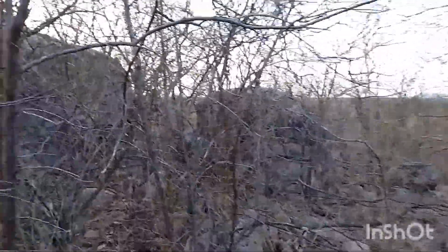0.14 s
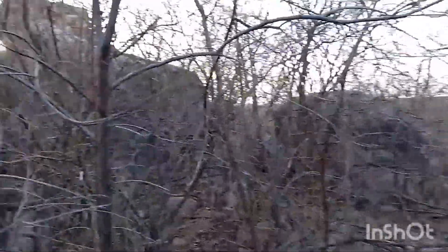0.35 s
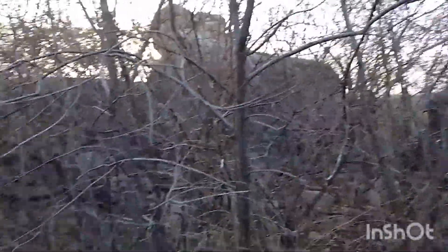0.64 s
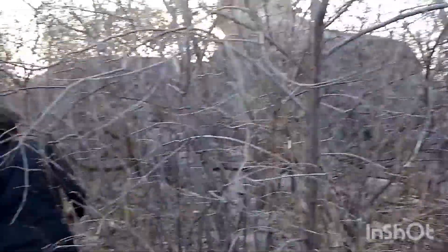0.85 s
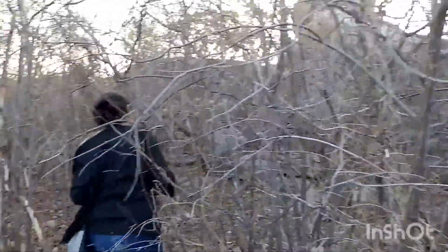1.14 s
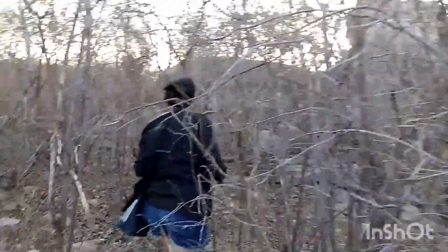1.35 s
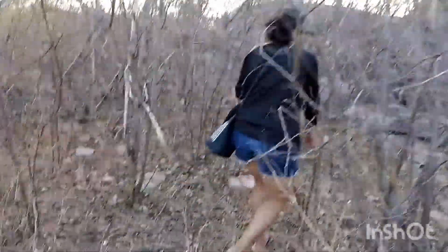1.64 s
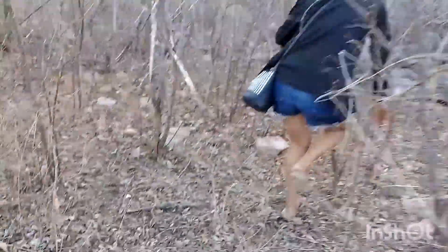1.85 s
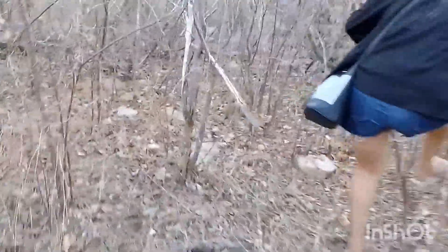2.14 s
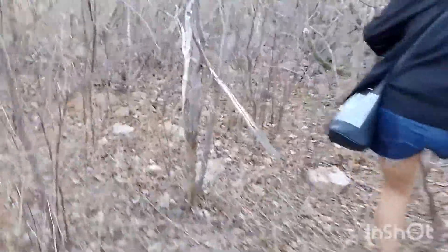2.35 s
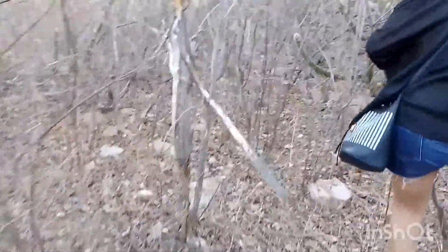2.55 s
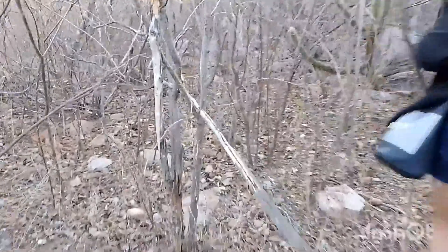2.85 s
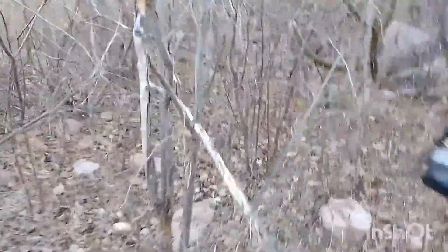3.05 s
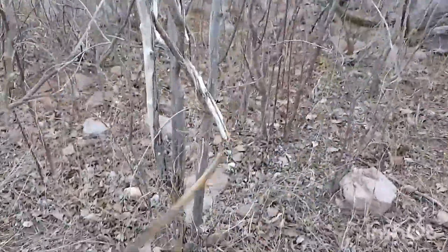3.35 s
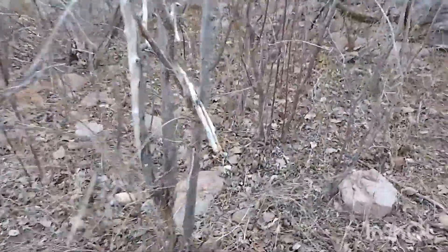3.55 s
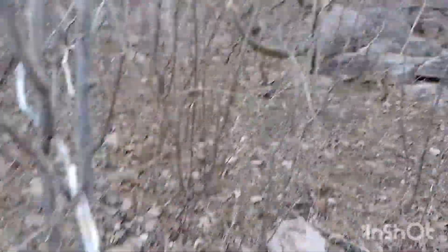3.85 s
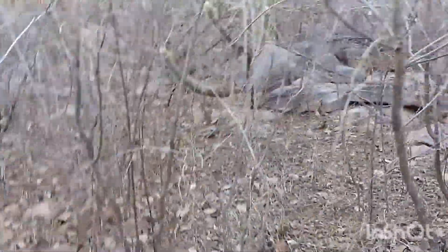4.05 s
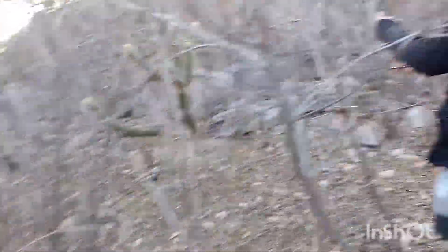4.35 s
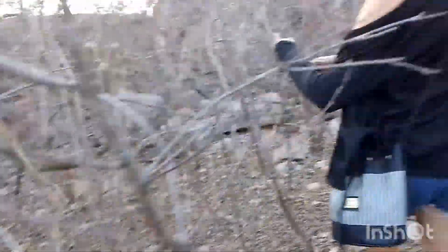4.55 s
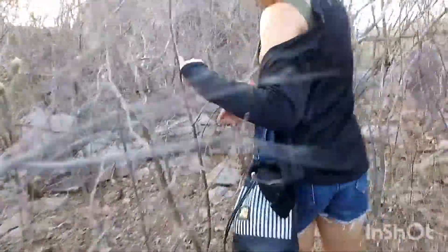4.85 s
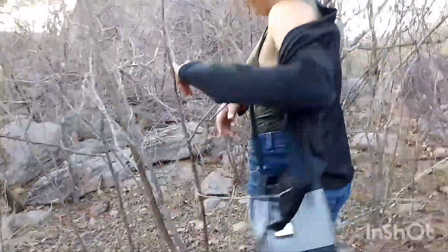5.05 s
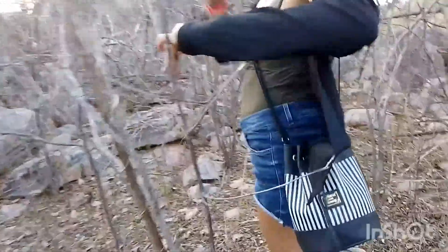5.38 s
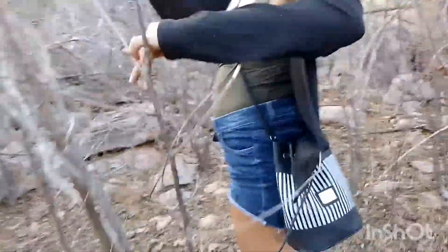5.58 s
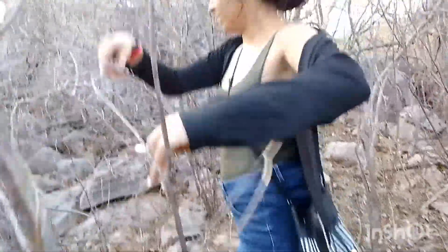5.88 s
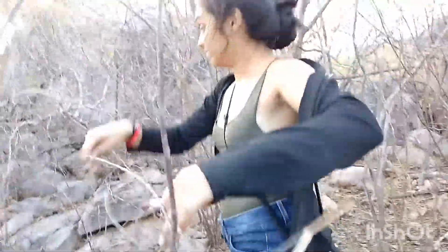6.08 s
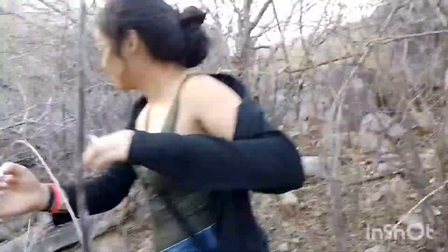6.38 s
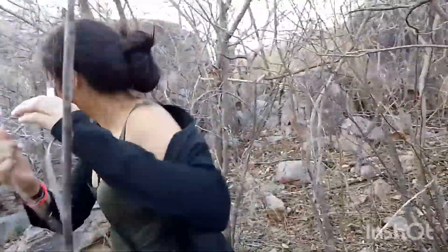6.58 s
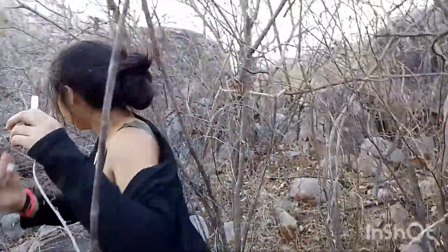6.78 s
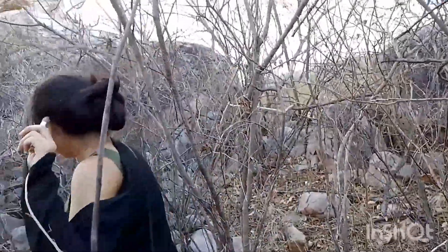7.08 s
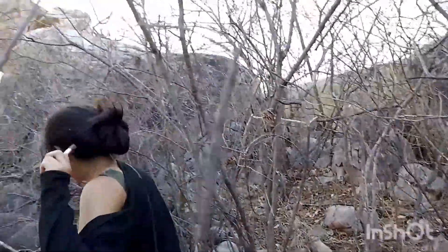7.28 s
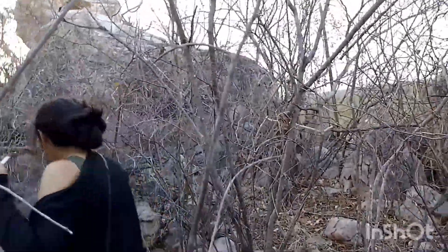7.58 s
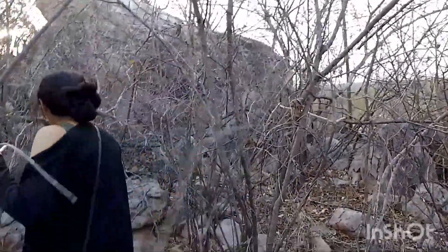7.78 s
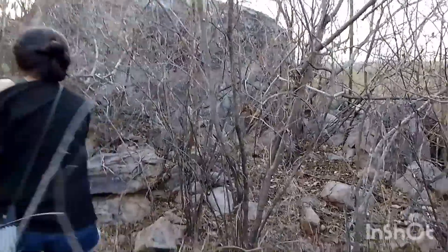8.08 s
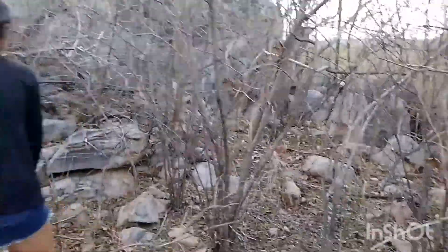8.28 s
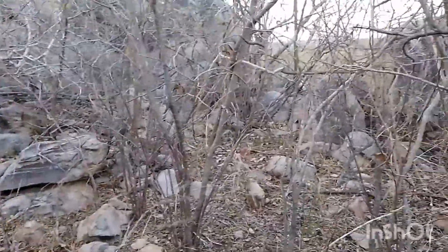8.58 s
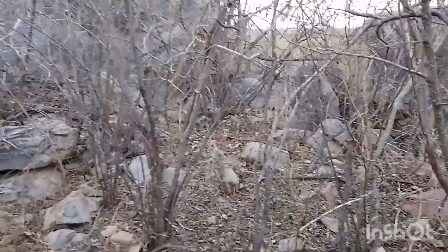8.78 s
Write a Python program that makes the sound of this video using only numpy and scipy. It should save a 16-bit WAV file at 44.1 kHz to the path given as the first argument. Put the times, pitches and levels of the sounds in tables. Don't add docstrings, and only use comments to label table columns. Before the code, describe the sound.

Outdoors, with a small microphone close to the body and barely audible low wind buffeting. From 0 to 1.8 s faint leaf rustle, branches whispering along cloth and scattered dry ticks, with a few light snaps. At 1.9 to 2.2 s a sudden crunch of bark and leaves with a short scrape and dull knock. Around 2.3 to 2.5 s a thin blade grazes a stem, a faint high ring; twigs snap until 3.3 s. At 3.35 s a sharp woody chop, the heaviest blow, followed by crackling and a loud stalk snap near 3.6 s. It eases around 4 s, then leaves swell from 4.5 s with tiny buckle jingles until 5.4 s. The densest, brightest snapping comes at 5.2 to 5.7 s, another cluster near 6.6 s. Then sparse ticks and small snaps, one crisp crunching push around 8.4 s, and fading rustle to 8.9 s.

```python
import sys
import numpy as np
from scipy import signal
from scipy.fft import rfft, irfft, next_fast_len
from scipy.io import wavfile
from scipy.ndimage import uniform_filter1d, map_coordinates

SR = 44100
rng = np.random.default_rng(int(sys.argv[2]) if len(sys.argv) > 2 else 0)


def gain_from_db(level_db):
    decades = np.asarray(level_db, float) / 20
    return 10 ** decades


def master_out(mix):
    frames = np.transpose(np.atleast_2d(mix))
    ceiling = np.clip(frames, -1, 1)
    pcm = np.round(ceiling * 32767).astype(np.int16)
    wavfile.write(sys.argv[1], SR, pcm)


N = 393352

# (time [s], level [dB])
BREEZE = [(0, -91), (1.8, -84), (2.3, -84), (3.3, -83), (4.25, -74), (4.6, -98.5), (5.2, -87), (5.5, -77),
          (5.8, -81), (6.2, -79), (6.6, -80), (6.9, -92.5), (8.1, -87), (8.45, -78), (8.92, -92)]
# (frequency [Hz], level [dB])
GUST_SPECTRUM = [(15, 1), (40, 0), (100, -4), (140, -10), (200, -25)]
# (time [s], peak [dB])
JOLTS = [(3.357, -40), (3.371, -40), (5.339, -58), (5.384, -59), (5.478, -52), (5.602, -50), (6.212, -63),
         (6.262, -62), (6.579, -47), (6.614, -53), (2.3, -78)]
# (time [s], peak [dB], pitch [Hz])
KNOCKS = [(0.503, -53, 580), (2.014, -41, 550), (2.209, -48, 307), (2.708, -47, 543), (3.172, -42.5, 573),
          (3.3405, -22, 814), (3.361, -26.5, 347), (5.375, -41, 288), (2.3, -51, 413), (5.066, -44.5, 340),
          (5.344, -43, 645), (5.635, -41, 465), (6.35, -53.5, 398), (6.448, -54, 700), (6.576, -46.5, 336),
          (8.103, -50.5, 870)]
# (start [s], end [s], level [dB], pitch [Hz])
SCRAPES = [(0, .2, -68.5, 2400), (0, 0.197, -71, 3380), (0, 0.224, -59, 5400), (0.203, 0.602, -59, 4140),
           (4.535, 4.614, -38, 6950), (4.45, 4.53, -43.5, 9740), (2.05, 2.143, -41, 6350),
           (3.93, 4, -48, 6450), (0.45, 1.003, -60.5, 2450), (0.553, 1.11, -58, 3310),
           (0.595, 1.16, -57.5, 5400), (0.165, 0.472, -59, 1644), (0.226, 0.947, -55, 6800),
           (0.225, 0.96, -51.5, 11640), (.23, 0.507, -51.5, 8670), (1.956, 1.973, -29, 2060),
           (3.166, 3.235, -54, 870), (4.457, 4.524, -46, 7150), (4.555, 4.75, -54.5, 1620),
           (4.617, 4.827, -62, 893), (4.642, 4.803, -51, 3200), (5.048, 5.186, -58.5, 1920),
           (5.334, 5.46, -45, 2510), (5.99, 6.322, -51, 1567), (6.673, 6.76, -54.5, 1490)]
# (frequency [Hz], level [dB], t60 [s])
BUCKLE_MODES = [(5593, -2, .2), (7788, 0, .2), (9300, -8, .08), (12485, -3, .15), (13650, -3, .15),
                (14950, -8, .12)]
# (time [s], level [dB], attack [s], favoured pitch [Hz])
JINGLES = [(2.6, -50.5, 0.0073, 7800), (0.084, -59, .001, 5700), (4.068, -55, .002, 8400),
           (4.07, -60, .002, 13100), (4.1, -56, .002, 12400), (4.55, -55, .003, 13650),
           (4.59, -50, .003, 13100), (4.618, -41.5, 0.0034, 5593), (4.644, -42, .003, 12485),
           (5.05, -54, 0.0019, 13650), (4.5, -55, .003, 13800), (4.619, -38, 0.0024, 7640),
           (4.679, -32, 0.0027, 7200), (4.995, -51, 0.004, 7788), (5.11, -45, 0.0031, 13100),
           (5.134, -38, .003, 13100), (5.37, -34, 0.0028, 12485), (6.83, -51, 0.017, 7700)]
# (frequency [Hz], level [dB], t60 [s])
BLADE_MODES = [(3520, -19, .2), (4250, -15, .45), (4853, -11, .4), (5416, -15, .25), (5983, -13, .3),
               (7717, -13, .12), (9052, -5, .22), (10240, 2, .17), (11265, -2, .17), (12175, 3, .14),
               (13080, -13, .12), (13925, -13, .12), (14780, -9, .25)]
# (time [s], level [dB], attack [s], favoured pitch [Hz])
TOUCHES = [
    (2.326, -43, 0.015, 10240),
    (2.343, -47, .003, 11265),
    (2.352, -48, .003, 12175),
    (2.424, -41, 0.0028, 11265),
    (2.428, -32.5, 0.0086, 10240),
    (2.467, -43, 0.0025, 11500),
    (2.498, -52, .002, 11800),
    (2.536, -45, 0.0035, 5800),
    (2.335, -54, .004, 4853),
]
# (time [s], level [dB], t60 [s])
CHOP_STEPS = [
    (3.34, -19, 0.056),
    (3.355, -23.5, 0.022),
    (3.365, -29, 0.04),
]
# (frequency [Hz], width [Hz], level [dB])
STEM_MODES = [(356, 390, 0), (860, 350, 2.5), (3090, 670, 4.5), (7200, 7500, -0.5)]
# (time [s], peak [dB], ring [Hz])
TICKS = [(0.2959, -26, 9200), (0.3286, -23, 8700), (0.36, -34, 9100), (0.4517, -29, 9100),
         (0.4693, -24, 9000), (0.4795, -24, 11500), (0.6232, -27, 11900), (0.7629, -23, 12000),
         (0.7723, -24, 12100), (0.8383, -28, 11500), (1.1271, -41, 13900), (1.2015, -36, 9100),
         (1.2712, -32, 9700), (1.3551, -33, 9800), (1.4549, -37, 9000), (1.5752, -35, 9100),
         (1.9275, -16, 6800), (1.9601, -14, 6160), (1.9951, -15.5, 6400), (2.0884, -18, 6470),
         (2.1156, -30, 6550), (2.1399, -39, 6740), (2.1459, -26, 6500), (2.1599, -18.5, 6200),
         (2.18, -27, 6400), (2.3471, -17, 7350), (2.621, -30, 8400), (2.7743, -17, 6300),
         (2.988, -34, 8950), (3.144, -25, 9600), (3.1815, -19, 6640), (3.1964, -15, 6900),
         (3.2311, -18, 6600), (3.2641, -22, 8000), (3.3332, -33, 8800), (3.4823, -14, 10000),
         (3.5084, -15, 9200), (3.5845, -13, 9700), (3.605, -19, 3020), (3.7697, -24, 11600),
         (3.9034, -22, 6100), (3.9405, -23, 9500), (3.9567, -21, 13500), (4.0242, -21.5, 7600),
         (4.036, -26, 14220), (4.0683, -21, 13600), (4.152, -32, 5100), (4.3785, -29, 10400),
         (4.5341, -21, 9400), (4.5956, -17.5, 9800), (4.668, -12, 10600), (4.7282, -15, 5700),
         (4.7775, -24, 8100), (4.8274, -15, 10000), (4.875, -20, 8400), (4.9323, -18, 9100),
         (4.9682, -27, 8900), (5.0175, -20, 8200), (5.0596, -24, 7870),
         (5.0972, -16, 8100), (5.1856, -13, 8300), (5.1897, -13, 7900), (5.2263, -13, 8800),
              (5.4766, -2, 14700), (5.5245, -10, 11900), (5.5429, -5, 14200), (5.5887, -4, 13100),
              (5.623, -6, 14200), (5.6603, -22, 7900), (5.7036, -11, 12800), (5.7445, -19, 5600),
              (5.8407, -18.5, 6600), (5.8509, -17, 14400), (6.069, -12.5, 8650), (6.119, -18, 9000),
              (6.122, -20, 8300), (6.1823, -16.5, 7200), (6.189, -19, 9600), (6.3168, -27, 9100),
              (6.3714, -17, 13700), (6.3852, -15, 13300), (6.4133, -20.5, 8400), (6.4744, -20, 9100),
              (6.5987, -13, 13900), (6.6277, -19, 8400), (6.658, -30, 7100), (6.7823, -27, 14000),
              (6.8074, -23, 8700), (6.8113, -22, 8800), (6.8367, -24, 8340), (6.8572, -20, 9500),
              (6.8616, -24, 13500), (6.8917, -22, 8940), (6.9285, -28, 10700), (7.187, -20, 14800),
              (7.198, -38, 12400), (7.301, -31, 9700), (7.3232, -23.5, 10700), (7.3301, -31, 11200),
              (7.358, -26, 8900), (7.517, -15.5, 9500), (7.5353, -31, 9800), (7.5427, -27, 10000),
              (7.5485, -22, 10000), (7.561, -27, 9800), (7.8411, -32, 9500), (7.848, -27, 7500),
              (7.9366, -30, 10400), (7.987, -26, 8100), (7.9993, -24, 9600), (8.1305, -26, 7100),
              (8.2163, -23, 9400), (8.3092, -17, 9300), (8.4213, -11, 7950), (8.4946, -22, 14300),
              (8.5745, -18, 6400), (8.7124, -36, 9600), (8.7336, -38, 11300), (8.761, -32, 6300)]
# (time [s], peak [dB], ring [Hz])
STALKS = [(.236, -17.5, 9000), (.5536, -24, 6700), (1.8959, -14, 14600), (2.1547, -15.5, 6350),
          (2.2994, -10.5, 9100), (2.66, -6.5, 5900), (3.0769, -10, 6570), (3.2808, -17.5, 8300),
          (3.4535, -7, 6800), (3.482, -11.5, 9900), (3.5878, 1.5, 9500), (3.976, -12, 12700),
          (4.4072, -17, 15400), (4.7124, -17, 7200), (5.2156, -7.5, 8700), (5.327, -5, 7550),
          (5.339, -6, 7670), (5.5942, -2.5, 10900), (5.6032, -5.5, 13700), (5.9232, -22, 8500),
          (6.208, -15, 8900), (6.6147, -2, 11000), (6.8013, -20.5, 8800), (7.1876, -25, 11700),
          (7.4317, -8.5, 10800), (7.983, -21, 7660), (8.021, -16.5, 10700), (8.3202, -12.5, 8300),
          (8.6074, -21, 12100)]
# (time [s], peak [dB], ring [Hz])
HUSKS = [(.0862, -29.5, 5900), (2.313, -14, 6650), (2.3233, -12.5, 8360), (2.345, -18, 8460),
         (2.3517, -19, 7800), (2.423, -26, 7300), (2.433, -28, 7750), (3.1686, -11.5, 6700),
         (3.356, 5, 7300), (3.363, -1.5, 6600), (5.1084, -9.5, 8350), (5.205, -12.5, 13400),
         (5.2949, -10, 10600), (6.3434, -6, 13900), (7.207, -30, 13700), (7.3479, -19.5, 8060),
         (8.2722, -11, 8630), (8.3982, -6.5, 7530)]
# (time [s], peak [dB], ring [Hz])
STICKS = [(.6371, -12, 6750), (1.533, -33, 10200), (1.927, -17, 6600), (1.942, -11, 13300),
          (1.9591, -14.5, 5900), (2.06, -16.5, 9300), (2.7107, -18, 10000), (2.904, -10.5, 8750),
          (3.0115, -4, 8250), (3.3435, -6, 9200), (3.4179, -9.5, 9050), (3.4435, -11, 10500),
          (3.6408, -2.5, 13200), (4.8267, -24, 9600), (5.4775, -7, 5600), (5.4797, -8, 9900),
          (5.5535, -5.5, 14500), (6.5787, -7, 9200), (6.5805, -8.5, 14400), (5.6225, -5.5, 15000),
          (5.6915, -16, 9000), (6.6213, -11, 10500), (7.7966, -27.5, 6860), (8.4204, -15.5, 8000),
          (8.8888, -24, 14100)]
# (time [s], peak [dB], ring [Hz])
TAPS = [
    (2.9055, -24, 1900),
    (2.916, -25, 1700),
    (2.929, -23, 2100),
    (2.94, -27, 2300),
    (5.6732, -23.5, 9000),
    (6.448, -38, 2920),
    (6.491, -32, 2800),
    (6.509, -33.5, 2880),
]
# (frequency [Hz], level [dB])
CRACK_SPECTRUM = [(1000, -21.5), (3000, -34), (5500, -6.5), (9000, 3.5), (12500, -6), (16500, -3)]
WOOD_SPECTRUM = [(200, -40), (500, -15), (1200, -9), (2500, -5.5), (4000, -3.5), (7000, -6.5)]
# (frequency [Hz], level [dB])
LEAF_SPECTRUM = [(6000, -50), (7500, -2.5), (8800, 2), (10300, 0), (11300, -27), (13000, -26)]
FLAKE_SPECTRUM = [(9500, -28), (11000, -1), (12000, -4), (14000, 0.5), (15500, -4), (17000, -6)]
BARK_SPECTRUM = [(3600, -56), (4600, -13), (5500, -2), (6800, 3), (7600, -7), (9000, -27)]
TWIG_SPECTRUM = [(800, -8), (1300, -7.5), (2200, -2.5), (3300, -2.5), (4200, 1), (5000, 0)]
SOIL_SPECTRUM = [(140, -37), (220, -1), (350, 3.5), (700, 0.5), (1100, -5), (1600, -17), (2500, -48)]
# (peak time [s], rise [s], fall [s], leaves [dB], flakes over leaves [dB])
BRUSHES = [(.28, 0.2, 0.48, -48.5, -7), (.66, .05, 0.18, -48, 4), (1.33, 0.14, 0.11, -43.5, -3),
           (1.95, 0.043, 0.061, -33.5, 4), (2.09, 0.09, 0.2, -40.5, -3), (2.33, .05, 0.087, -41, -5),
           (2.46, 0.096, 0.15, -44, -17), (2.73, 0.08, 0.7, -39.5, -6), (3.2, 0.12, 0.1, -42, 0),
           (3.47, 0.13, 0.72, -34, 1.5), (3.92, 0.42, 0.13, -45.5, -5), (4.58, 0.091, 0.33, -33.5, -20),
           (4.7, 0.13, .28, -33, -2.5), (5.13, 0.13, .1, -38.5, -7), (5.25, 0.11, 0.45, -31.5, -3),
           (5.58, 0.62, 0.29, -30.5, 3), (6.08, 0.11, 0.42, -34.5, -15), (6.37, 0.056, 0.35, -40.5, -5),
           (6.68, 0.12, 0.1, -31.5, -2.5), (6.84, 0.072, 0.2, -43.5, -9), (7.34, 0.035, 0.07, -51, -31),
           (7.52, 0.11, 0.069, -39.5, -4), (8.02, 0.16, 0.53, -46.5, -2.5), (8.42, 0.28, 0.3, -34, -3)]
# (peak time [s], rise [s], fall [s], bark [dB], twigs over bark [dB])
CRUSHES = [(0.0, 0.12, 0.047, -56, -1), (.26, 0.084, 0.1, -54, 1), (.7, 0.26, 0.18, -50, 0),
           (1.33, 0.059, 0.095, -57.5, -2), (1.95, 0.027, 0.054, -29.5, -3.5), (2.09, 0.082, 0.2, -41, -9),
           (2.33, 0.1, 0.43, -47, -18), (2.72, 0.058, 0.27, -38.5, -11), (2.91, 0.2, 0.17, -42, -1),
           (3.2, 0.18, 0.12, -38, -13.5), (3.38, 0.04, 0.38, -35, -7.5), (3.75, 0.58, 0.37, -41, -3.5),
           (4.66, 0.2, 0.32, -32.5, -17), (5.13, 0.15, 0.078, -47.5, -4.5), (5.25, 0.17, 0.28, -35, -26),
           (5.56, 0.34, 0.27, -28.5, -9.5), (6.07, 0.11, 0.17, -38, -11.5), (6.37, 0.19, 0.12, -43.5, -12),
           (6.68, 0.21, 0.12, -38.5, -11), (7.34, .05, 0.068, -55.5, -9), (7.46, 0.038, 0.17, -56, 1),
           (8.05, 0.46, 1, -53, -8.5), (8.42, 0.081, 0.29, -40.5, -13.5), (8.91, 0.29, 0.12, -55, -6.5)]
REST_DB = [-61.5, -61, -64.5, -65]
# (start [s], end [s], delay [ms], level [dB])
ECHOES = [
    (0.213, 1.008, 2.44, -17),
    (0.26, 1.008, 3.07, -11),
    (4.625, 5.427, 2.15, -9.5),
    (6.673, 6.768, 1.62, -9),
    (8.295, 8.734, 1.4, -22),
]


def unit(x):
    return x / np.sqrt(np.mean(x ** 2) + 1e-20)


def wobble(rate):
    coarse = np.arange(0, N + 32, 32)
    knots = rng.standard_normal(int(N * rate / SR) + 4)
    return np.interp(np.arange(N), coarse, map_coordinates(knots, [coarse * rate / SR]))


def filtered(x, response):
    m = next_fast_len(len(x) + 8192)
    return irfft(rfft(x, m) * response(np.fft.rfftfreq(m, 1 / SR)), m)[:len(x)]


def colour(points):
    f, db = np.transpose(points)
    return lambda hz: gain_from_db(np.interp(np.log(hz + 1), np.log(f), db, -120, -120))


def band(hz, width):
    return lambda f: 1j * f * width / (hz * hz - f * f + 1j * f * width)


def noise(count, response):
    m = next_fast_len(count)
    white = rng.standard_normal(m)
    return unit(irfft(rfft(white) * response(np.fft.rfftfreq(m, 1 / SR)), m))[:count]


def place(out, s, sound):
    out[round(s * SR):][:len(sound)] += sound


def breeze():
    lumps = gain_from_db(3.9 * wobble(7.1))
    s, db = np.transpose(BREEZE)
    level = gain_from_db(np.interp(np.arange(N) / SR, s, db))
    return level * unit(filtered(lumps * rng.standard_normal(N), colour(GUST_SPECTRUM)))


def jolts():
    lead = SR // 100
    out, t = np.zeros(N), np.arange(-lead, lead) / SR
    push = np.exp(-(t / 0.00071) ** 2)
    for s, db in JOLTS:
        out[round(s * SR) - lead:][:len(t)] += gain_from_db(db) * push
    return out


def knocks():
    out, t = np.zeros(N + SR), np.arange(SR // 5) / SR
    push = t / 0.0031 * np.exp(-t / 0.0034)
    for s, db, hz in KNOCKS:
        tone = np.sin(2 * np.pi * hz * t) + 0.33 * np.sin(2 * np.pi * 2.1 * hz * t)
        place(out, s, gain_from_db(db + 4.5) * push * tone)
    return out[:N]


def scrapes():
    out = np.zeros(N + SR)
    for s, end, db, hz in SCRAPES:
        u = np.linspace(0, 1, max(round((end - s) * SR), 2))
        ring = band(hz, 200 + 0.035 * hz)
        rub = noise(max(len(u), SR // 4), lambda f: ring(f) ** 2)
        place(out, s, gain_from_db(db) * rub[:len(u)] * np.sin(np.pi * u ** 0.54))
    grit = gain_from_db(3.2 * wobble(60))
    return out[:N] * grit


def rings(modes, hits, scatter_db):
    out, t = np.zeros(N + SR), np.arange(SR // 2) / SR
    hz, level_db, t60 = np.transpose(modes)[..., None]
    for s, db, attack, favoured_hz in hits:
        strength, phase = rng.standard_normal((2, len(modes), 1))
        favour_db = 15 * np.exp(-((hz - favoured_hz) / 650) ** 2)
        strike_db = level_db + favour_db + scatter_db * strength
        tones = gain_from_db(strike_db - 60 * t / t60) * np.sin(2 * np.pi * (hz * t + phase))
        place(out, s, gain_from_db(db) * (1 - np.exp(-t / attack)) * tones.sum(0))
    return out[:N]


def buckle():
    return rings(BUCKLE_MODES, JINGLES, scatter_db=0.75)


def blade():
    return rings(BLADE_MODES, TOUCHES, scatter_db=0.72)


def chop():
    t = np.arange(N) / SR
    bite = sum(gain_from_db(db - 60 * np.maximum(t - s, 0) / t60) * (t >= s) for s, db, t60 in CHOP_STEPS)

    def stem(f):
        modes = [(-1) ** k * gain_from_db(db) * band(hz, width)(f) for k, (hz, width, db) in enumerate(STEM_MODES)]
        return sum(modes) * f / (f + 200)

    return 4.2 * filtered(bite * rng.standard_normal(N), stem)


def ticks():
    out, t = np.zeros(N + SR), np.arange(SR // 40) / SR
    t60 = 0.011
    shape = gain_from_db(-60 * t / t60) * (1 - np.exp(-t / 0.00022))
    hz = np.fft.rfftfreq(len(t), 1 / SR)
    broad = 0.25 * colour(CRACK_SPECTRUM)(hz)
    for s, db, ring_hz in TICKS:
        tone = band(ring_hz, 0.096 * ring_hz)(hz) + broad
        tick = shape * irfft(rfft(rng.standard_normal(len(t))) * tone, len(t))
        place(out, s, gain_from_db(db - 3.0) * tick / np.max(np.abs(tick)))
    return out[:N]


def snap(hz, t60, wood_db):
    t = np.arange(SR // 8) / SR
    rise = 1 - np.exp(-t / 0.00032)
    spike = gain_from_db(14 - 60 * t / .005)
    ring_decay = gain_from_db(-60 * t / max(t60, .004))
    tail = gain_from_db(-13 - 60 * t / 0.07)
    matter = 0.48 * noise(len(t), colour(CRACK_SPECTRUM)) + 0.6 * noise(len(t), band(hz, 0.086 * hz))
    crack = rise * (spike + ring_decay + tail) * matter
    wood_shape = gain_from_db(wood_db + 2.0 - 60 * t / 0.063) * (1 - np.exp(-t / 0.00057))
    wood = noise(len(t), colour(WOOD_SPECTRUM)) * wood_shape
    return 0.81 * crack / np.max(np.abs(crack)) + 0.37 * wood


def snaps():
    out = np.zeros(N + SR)
    # (events, t60 [s], wood [dB])
    for events, t60, wood_db in [(STALKS, 0.025, -29), (HUSKS, 0.071, -26.5), (STICKS, 0.036, -18), (TAPS, 0.023, -3.5)]:
        for s, db, hz in events:
            place(out, s, gain_from_db(db) * snap(hz, t60, wood_db))
    return out[:N]


def patchy(x, patchy_db, streak_db):
    z = signal.stft(x, nperseg=256)[2]

    def smooth(bins, frames):
        rough = rng.standard_normal(z.shape)
        return unit(uniform_filter1d(uniform_filter1d(rough, size=bins, axis=0), size=frames, axis=1))

    gain = gain_from_db(patchy_db * smooth(8, 14) + streak_db * smooth(2, 60))
    return signal.istft(z * gain, nperseg=256)[1][:N]


def crackle(count, spread_db, t60):
    draw = rng.random((count, 2))
    energy = gain_from_db(-spread_db * np.log(draw[:, 1] + .01)) ** 2
    kicks = np.bincount((draw[:, 0] * N).astype(int), energy, N)
    dying = signal.lfilter([1], [1, -10 ** (-6 / (t60 * SR))], kicks)
    return unit(np.sqrt(np.abs(uniform_filter1d(dying, size=40))))


def grains(count, size, low_hz, high_hz, cycles, spread_db):
    draw, k = rng.random((count, 3)), np.arange(size)
    turns = low_hz * (high_hz / low_hz) ** draw[:, 1:2] * k / SR
    shape = np.sin(2 * np.pi * turns) * turns * np.exp(-turns / cycles) * (1 - k / size)
    shape = shape * gain_from_db(-spread_db * np.log(draw[:, 2:] + .01))
    at = (draw[:, :1] * N).astype(int) + k
    return unit(np.bincount(at.ravel(), shape.ravel(), N + size)[:N])


def pushes(rows, rests_db):
    edge_db, roundness = 15.5, 1.29
    t, power = np.arange(0, N, 64) / SR, 0
    for s, rise, fall, db, over_db in rows:
        away = np.abs(t - s) / np.where(t < s, max(rise, .01), max(fall, .01))
        power = power + gain_from_db(db - edge_db * away ** roundness + np.array([[0], [over_db]])) ** 2
    return [np.interp(np.arange(N) / SR, t, 10 * np.log10(p + gain_from_db(db) ** 2))
            for p, db in zip(power, rests_db)]


def thicken(thin, source, level_db):
    half_db, span_db, pitch = -36.5, 10.5, 0.75
    heavy = np.clip(.5 + (level_db - half_db) / span_db, 0, 1) * np.pi / 2
    thick = unit(filtered(source[::-1], lambda hz: colour(BARK_SPECTRUM)(hz / pitch)))
    return np.cos(0.56 * heavy) * thin + np.sin(0.47 * heavy) * thick


def rustle():
    breaks = crackle(count=3000, spread_db=2.8, t60=.01)
    clumps = wobble(30)
    bits = grains(count=12000, size=200, low_hz=4990, high_hz=15420, cycles=8.2, spread_db=3.0)
    levels_db = pushes(BRUSHES, REST_DB[:2]) + pushes(CRUSHES, REST_DB[2:])
    twigs_db = levels_db[-1]
    levels_db.append(-70 + 0.73 * uniform_filter1d(twigs_db - twigs_db.mean(), size=round(0.23 * SR)))
    effort = np.clip((levels_db[0] + 88) / 24, .1, 1)
    # (spectrum, share of breaks, clumps [dB], patches [dB], streaks [dB], ringing bits [dB])
    kinds = [(LEAF_SPECTRUM, .4, 1.8, 1.5, 2.5, -6), (FLAKE_SPECTRUM, .45, 1.8, 1.5, 2.5, -6),
             (BARK_SPECTRUM, .35, 1.8, 1.5, 2.5, -8), (TWIG_SPECTRUM, .5, 1.6, 1.2, 2.2, -30),
             (SOIL_SPECTRUM, .3, 1.2, 1.4, 1.2, -30)]
    out = np.zeros(N)
    for level_db, (spectrum, share, clump_db, patchy_db, streak_db, bits_db) in zip(levels_db, kinds):
        share = np.clip(share * effort, 0, 1)
        gate = np.sqrt(1 - share + share * breaks ** 2)
        source = patchy(gate * rng.standard_normal(N), patchy_db, streak_db)
        source = source + gain_from_db(bits_db) * effort * bits
        sound = unit(filtered(source, colour(spectrum)))
        if spectrum is BARK_SPECTRUM:
            sound = thicken(sound, source, level_db)
        out += gain_from_db(level_db + clump_db * effort * clumps) * sound
    return out


def echoed(x):
    out, t = x.copy(), np.arange(N) / SR
    for s, end, ms, db in ECHOES:
        fade = np.clip(np.minimum(t - s, end - t) / .02, 0, 1)
        delay = ms / 1000 * (1 + .015 * wobble(12))
        out += gain_from_db(db) * fade * np.interp(t - delay, t, x)
    return out


def scene():
    around = breeze() + jolts() + knocks() + scrapes()
    metal = buckle() + blade() + chop()
    brush = ticks() + snaps() + echoed(rustle())
    return (around + metal + brush)[None]


def band_limit(x):
    return signal.sosfilt(signal.butter(12, 16630, fs=SR, output="sos"), x)


def record(dry):
    top_hz = 15600
    x = filtered(dry[0], lambda hz: gain_from_db(-38 * np.clip((hz - top_hz) / 250 + .5, 0, 1)))
    held = x / (1 + np.abs(x / .8) ** 6) ** (1 / 6)
    return band_limit(held[None])


dry = scene()
out = record(dry)
master_out(out)
```